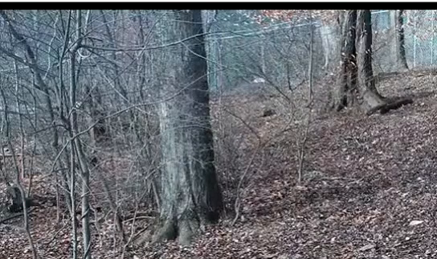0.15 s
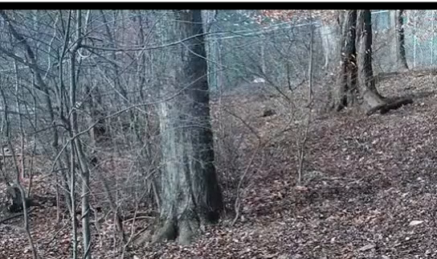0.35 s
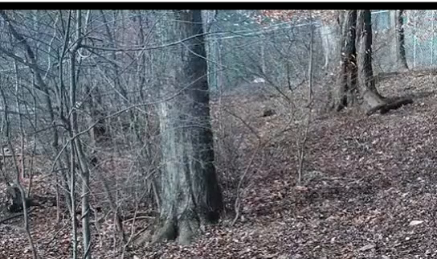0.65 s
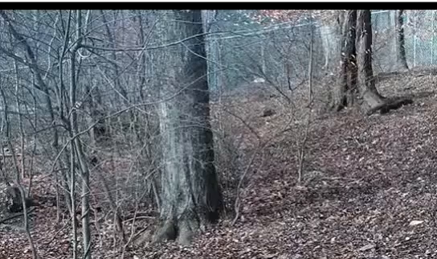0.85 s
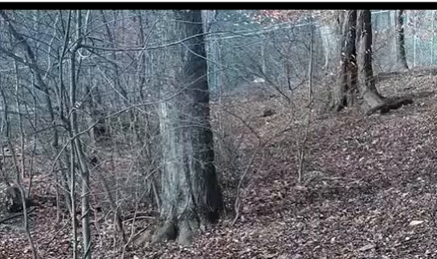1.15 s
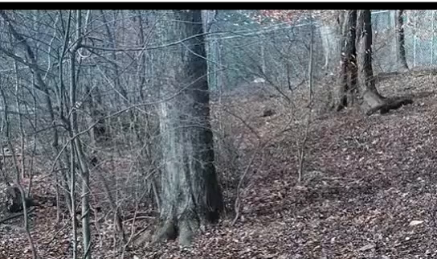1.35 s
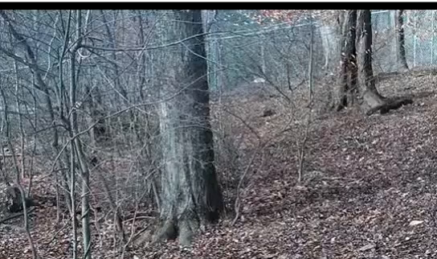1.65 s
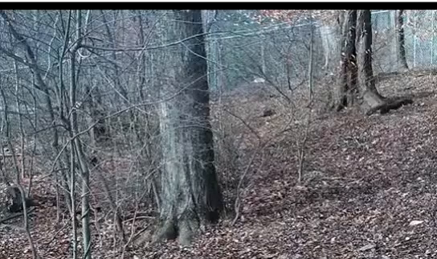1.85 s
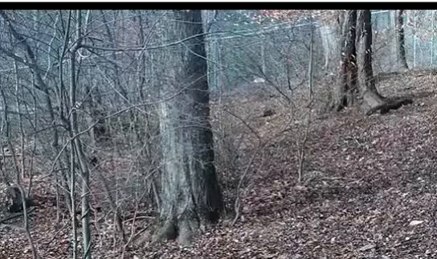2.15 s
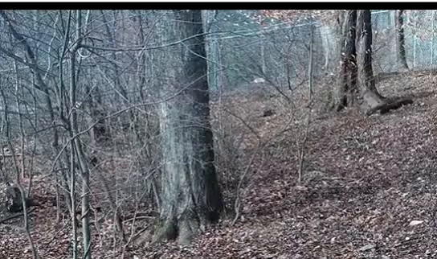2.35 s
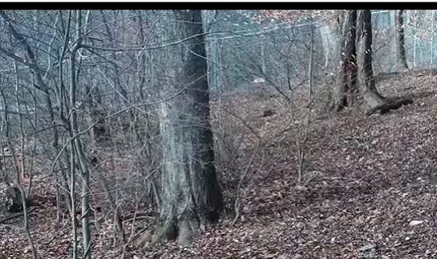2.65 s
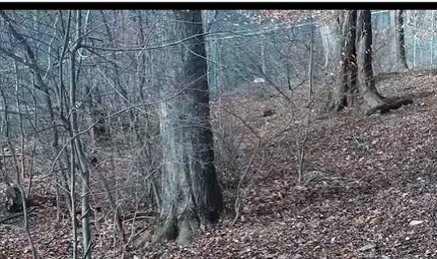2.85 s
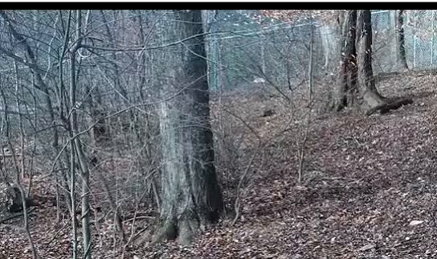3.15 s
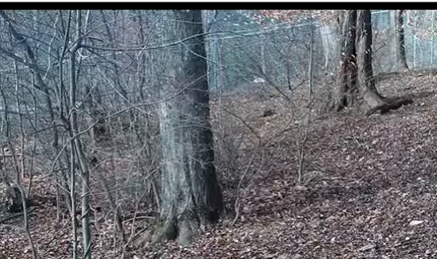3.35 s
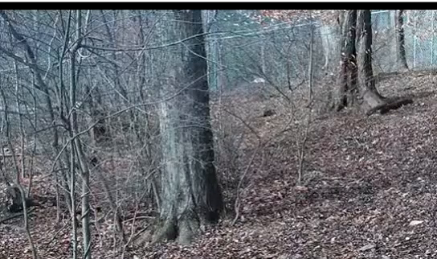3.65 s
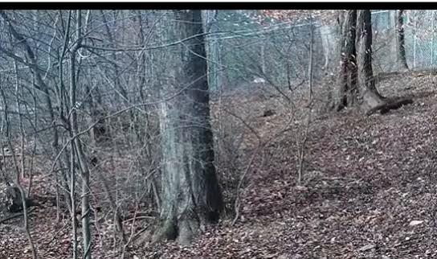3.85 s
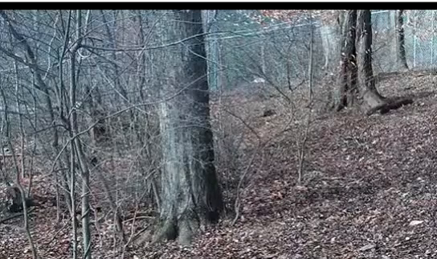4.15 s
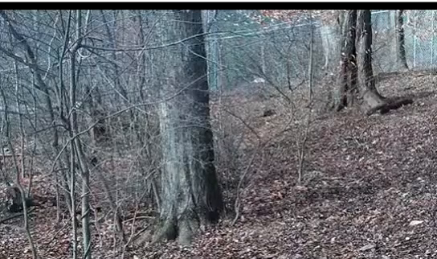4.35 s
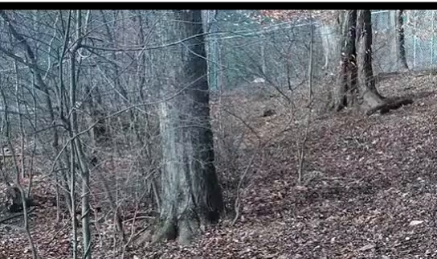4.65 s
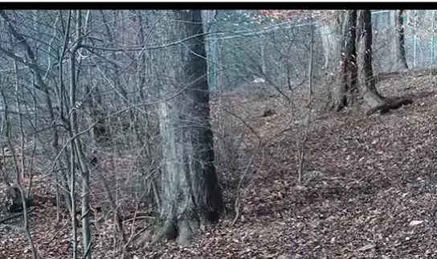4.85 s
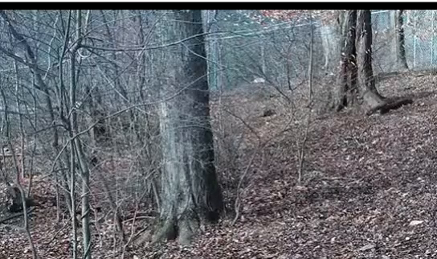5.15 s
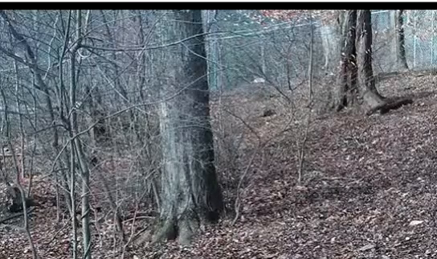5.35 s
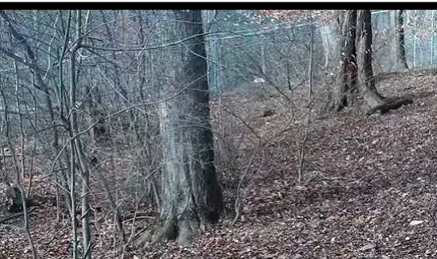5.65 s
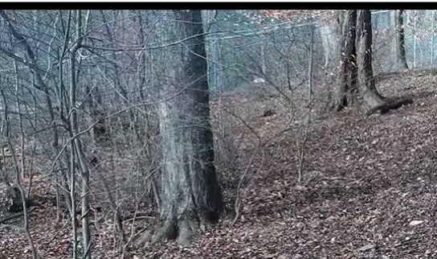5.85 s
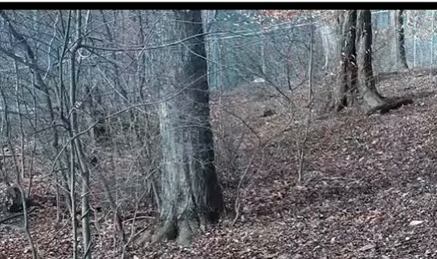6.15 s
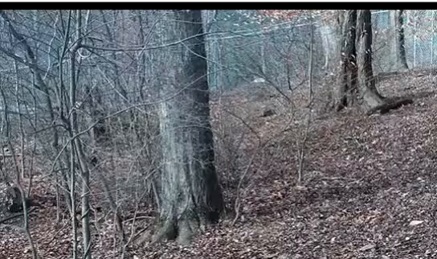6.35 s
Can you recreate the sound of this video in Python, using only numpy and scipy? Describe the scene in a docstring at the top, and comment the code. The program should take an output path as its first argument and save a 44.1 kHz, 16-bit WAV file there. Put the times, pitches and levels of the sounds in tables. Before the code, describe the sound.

From the start, wind buffets a small camera's microphone in a bare wood, making a low, fluttering rumble that is strongest in the first second. Short, low moans waver inside it, like far howls or air blowing over an opening. A faint hiss of dry leaves and a thin electronic buzz continue throughout, and the overall tone is muffled. Puffs of air and small rustles begin near 0.4 seconds and return now and then. The sound drops out for an instant, with sharp clicks and a soft thump, at about 0.5, 2.1 and 3.9 seconds. A longer howl comes at 1.6 seconds, then the wind eases briefly before building again. More howls follow at 4.0 and 4.7 seconds. From 5.2 seconds the clearest howl holds, trembling, sinking slightly in pitch and rising again, with light leaf rustles, until the end at about 6.5 seconds.

```python
"""From the start, wind buffets a small camera's microphone in a bare wood, and short low moans (far howls,
or air over the port) waver in it. Dry leaves hiss and the camera's electronics buzz at 60 Hz. Puffs and
rustles begin near 0.4 s. The recorder stalls with clicks and thumps near 0.5, 2.1 and 3.9 s. Longer howls
come at 1.6, 4.0 and 4.7 s, and the last one holds from 5.2 s to the end."""
import sys
import numpy as np
from scipy import signal
from scipy.fft import rfft, irfft, next_fast_len
from scipy.io import wavfile
from scipy.ndimage import uniform_filter1d

SR = 44100
rng = np.random.default_rng(int(sys.argv[2]) if len(sys.argv) > 2 else 0)


def put_to_file(sound):
    """Save the sound as 16-bit audio at rate SR, in the file named by the first command-line argument."""
    columns = np.atleast_2d(sound).T  # one column per channel
    safe = np.clip(columns, -1, 1)
    whole_steps = np.round(safe * 32767)
    wavfile.write(sys.argv[1], SR, whole_steps.astype(np.int16))


N = 286209
t = np.arange(N) / SR
PAN = np.array([[.5], [-.5]])  # splits a left-minus-right dB value


def undb(db):
    """dB to gain."""
    return 10 ** (np.asarray(db) / 20)


def unit(x):
    """Scale to rms 1."""
    return x / np.sqrt(np.mean(x ** 2))


def walk(rate_hz):
    """Random steps, smoothed twice, rms 1."""
    hold = int(SR / rate_hz)
    steps = np.repeat(rng.standard_normal(N // hold + 1), hold)
    return unit(uniform_filter1d(uniform_filter1d(steps, hold), hold)[:N])


def on_log(hz, table):
    """Interpolate (freq_hz, value) rows on a log axis."""
    freq_hz, values = np.transpose(table)
    return np.interp(np.log(hz), np.log(freq_hz), values)


def band(hz, log_width, coherence):
    """Stereo noise band, Gaussian in log frequency, rms 1."""
    size = next_fast_len(N, True)
    bell = np.exp(-.5 * (np.log(np.fft.rfftfreq(size, 1 / SR) / hz + 1e-9) / log_width) ** 2)

    def noise():
        phase = np.exp(2j * np.pi * rng.random(len(bell)))
        return unit(irfft(bell * phase * rng.rayleigh(size=len(bell)), size)[:N])

    mid = np.sqrt((1 + coherence) / 2) * noise()
    side = np.sqrt((1 - coherence) / 2) * noise()
    return np.array([mid + side, mid - side])


def bursts(rows, log_width, coherence):
    """Gaussian swells of band noise, each normalised to its level."""
    out = 0
    for centre_s, db, hz, sigma_ms in rows:
        swell = np.exp(-.5 * ((t - centre_s) * 1000 / sigma_ms) ** 2)
        burst = swell * band(hz, log_width, coherence)
        out += undb(db) * burst * np.sqrt(np.sum(swell ** 2) / np.sum(burst.mean(axis=0) ** 2))
    return out


def wavering_tone(time_s, hz, db, waver, flutter_db, flutter_hz, fade_s=.02):
    """Sine along a pitch and level curve, shivering in both."""
    gate = np.clip(np.minimum(t - time_s[0] + fade_s, time_s[-1] + fade_s - t) / fade_s, 0, 1)
    pitch_hz = np.interp(t, time_s, hz) * (1 + waver * walk(30))
    gain = undb(np.interp(t, time_s, db) + flutter_db * walk(flutter_hz))
    return gate * gain * np.sqrt(2) * np.sin(2 * np.pi * np.cumsum(pitch_hz) / SR)


# gust strength: time_s, deep_db, body_db, flutter_db
GUSTS = [(0.0, -28.5, -24, -29), (0.499, -26.5, -16, -26), (.8, -28.5, -25, -30.5), (1.14, -28.5, -22, -33),
         (1.55, -31.5, -26, -37.5), (1.8, -31.5, -22.5, -30.5), (2.2, -33.5, -31, -38.5),
         (2.6, -27, -37.5, -39.5), (2.93, -30.5, -28, -34.5), (3.2, -28, -28.5, -30),
         (3.61, -25, -32, -35.5), (3.83, -25, -27.5, -31), (4.03, -30, -28.5, -38.5),
         (4.3, -28.5, -29, -31.5), (4.63, -27.5, -23, -35), (5.08, -28.5, -24.5, -31),
         (5.5, -35.5, -30.5, -31), (5.86, -26.5, -22.5, -32), (6.2, -31, -22.5, -30.5),
         (6.49, -31, -28, -32)]
# gust register centres: deep_hz, body_hz, flutter_hz
REGISTERS_HZ = [70, 180, 340]
# rumble spectrum: freq_hz, gain_db
WIND_SPECTRUM = [(28, -26), (50, -10.5), (90, -1.5), (140, 0), (220, 2.5), (320, -0.5), (450, -9.5),
                 (640, -29.5), (900, -38)]
# brief dips in the low noise, broad in the bass, narrow and hollow just above the moans' pitch:
# centre_s, half_length_ms, depth_db, low_hz, high_hz
LOW_DIPS = [(2.54, 110, -13, 20, 220), (2.58, 90, -13, 325, 365), (2.83, 27, -11, 20, 130),
            (3.51, 59, -12.5, 20, 141), (3.82, 60, -9.5, 280, 428), (4.17, 87, -11, 290, 315),
            (4.26, 59, -19, 325, 410), (4.41, 23, -7, 21, 300), (4.809, 75, -10, 223, 320),
            (5.43, 120, -38, 230, 314), (5.47, 66, -6.5, 21, 90), (5.69, 42, -20, 190, 320),
            (5.771, 40, -16, 20, 150), (6.02, 39, -9, 20, 150), (6.14, 90, -19, 236, 326),
            (6.19, 29, -12, 20.2, 120), (6.38, 50, -20.5, 230, 318)]


def wind():
    """Eddies on the microphone ports: narrow bands follow the gusts, each with its own flicker."""
    time_s, *register_db = np.transpose(GUSTS)
    out, shake_db = 0, 2.09 * walk(22.013)
    for hz in 28 * 2 ** np.arange(0, 5.1, 1 / 5):
        weights = [np.interp(np.log(hz), np.log(REGISTERS_HZ), row) for row in np.eye(3)]
        db = np.interp(t, time_s, np.dot(weights, register_db)) + on_log(hz, WIND_SPECTRUM)
        db += shake_db + 2.26 * walk(9)
        for centre_s, half_ms, depth_db, low_hz, high_hz in LOW_DIPS:
            window = np.exp(-np.square(((t - centre_s) * 1000 / half_ms) ** 2))
            db += depth_db * window / (1 + (low_hz / hz) ** 20) / (1 + (hz / high_hz) ** 20)
        coherence = on_log(hz, [(30, .32), (70, .73), (150, 1), (300, .97), (700, .99)])
        out += undb(db - 4.5) * band(hz, .079, coherence)
    return out


# short moans: start_s, length_s, first_hz, last_hz, level_db
MOANS = [(0.0, 0.053, 210, 217, -12), (.02, 0.11, 152, 145, -16.5), (.06, 0.14, 307.2, 285, -13.5),
         (.21, 0.13, 218, 205.4, -14.5), (.41, 0.044, 192.8, 193, -17.5), (.62, 0.108, 144.7, 161, -12),
         (.68, 0.15, 217, 184.2, -14), (.85, 0.36, 137.9, 131, -22.5), (1.265, 0.072, 250, 188, -13),
         (2.45, 0.21, 134.7, 134.3, -33.5), (2.68, 0.085, 100.3, 91, -27), (2.75, 0.073, 214.6, 202, -28),
         (2.78, 0.094, 160, 160, -23.5), (2.88, 0.19, 125, 122.5, -21), (3.1, 0.12, 222, 210, -21),
         (3.24, 0.1, 282, 240, -23), (3.35, 0.08, 270.3, 243, -23), (3.62, 0.063, 150.3, 230, -18),
         (3.24, 0.14, 148.4, 121, -22), (3.45, 0.18, 165, 180, -23.5), (3.72, 0.18, 207.1, 206.3, -23),
         (3.74, 0.079, 140.5, 134, -25.5), (3.96, 0.09, 149.5, 144.5, -16.5), (4.28, 0.12, 130, 124, -26),
         (4.58, 0.19, 175, 152, -24.5), (4.76, 0.19, 138.9, 157.4, -21.5),
         (5.08, 0.19, 150.8, 157.2, -18.5), (3.98, 0.17, 79.7, 91, -26), (5.52, 0.16, 80, 72, -29.5),
         (5.83, 0.14, 149.1, 145, -28), (2.3, 0.098, 94, 100, -34), (2.41, 0.094, 214.8, 242, -37)]


def moans(attack_share=.41, release_share=.46, edge_db=-8):
    """Far howls or air over the port: short tones swell, hold and fade as they glide."""
    progress = np.array([0, attack_share, 1 - release_share, 1])
    out = 0
    for start_s, length_s, first_hz, last_hz, level_db in MOANS:
        time_s = start_s + length_s * progress
        hz = first_hz + (last_hz - first_hz) * progress
        db = level_db + np.array([edge_db, 0, 0, edge_db])
        out += wavering_tone(time_s, hz, db, waver=.011, flutter_db=2.2, flutter_hz=38)
    return out


# hiss strength: time_s, level_db
LEAF_LEVELS = [(0.0, -45), (0.38, -45.5), (1.08, -47.5), (1.81, -44.5), (2.44, -46.5), (3.4, -45),
               (4.8, -44.5), (5.4, -45), (5.78, -44.5), (6.49, -45.5)]
# hiss spectrum: freq_hz, density_db
LEAF_SPECTRUM = [(500, 9), (800, -1.5), (1200, -6), (1800, -7.5), (2300, -1), (2850, 2), (3300, -4),
                 (3800, -9), (4600, -9), (6800, -14)]


def leaves():
    """Distant dry leaves: a smooth hiss, its treble to the left."""
    out, swell_db = 0, .4 * walk(6.6)
    for hz in 500 * 2 ** np.arange(0, 3.9, 1 / 6):
        bandwidth_db = 10 * np.log10(hz / 2900)
        db = on_log(hz, LEAF_SPECTRUM) + bandwidth_db + swell_db + 1.2 * walk(18)
        pan_db = on_log(hz, [(700, -2), (1300, -.5), (2400, .5), (4400, 14)])
        coherence = on_log(hz, [(500, .82), (1400, .75), (3000, .58), (6000, .3)])
        out += undb(db - 8) * undb(pan_db * PAN) * band(hz, .055, coherence)
    return out * undb(np.interp(t, *np.transpose(LEAF_LEVELS)))


# ticks of one cycle: offset_ms, ring_hz, relative_db, sigma_ms, sign
BUZZ_TICKS = [(.12, 3920, -28.5, .1, -1), (1.05, 6450, -47.5, .3, 1), (1.52, 5500, -31, .125, 1),
              (2.22, 6400, -47.5, .4, -1), (2.58, 4340, -39, .175, -1), (5.5, 4450, -42.5, .14, -1),
              (8.47, 3050, -32, .135, 1), (9.05, 6450, -47, .2, -1), (10.25, 5250, -45.5, .15, 1),
              (10.92, 4400, -39, .16, 1), (11.16, 4300, -41, .23, 1), (13.84, 4570, -45, .15, 1)]
# cycle timing, shifted by the stalls: from_s, cycle_start_ms
BUZZ_TIMING = [(0, 5.1), (.49, 15.55), (2.067, 5.85), (3.95, 9.3)]


def buzz(rate_hz=60.002, flicker_db=1, trim_db=2.2):
    """Camera electronics: the same ringing ticks in every cycle."""
    from_s, start_ms = np.transpose(BUZZ_TIMING)
    clock_ms = 1000 * t - start_ms[np.searchsorted(from_s, t, "right") - 1]
    out, cycle_ms = 0, 1000 / rate_hz
    for offset_ms, hz, db, sigma_ms, sign in BUZZ_TICKS:
        tick_ms = (clock_ms - offset_ms + cycle_ms / 2) % cycle_ms - cycle_ms / 2
        tick = np.exp(-.5 * (tick_ms / sigma_ms) ** 2) * np.cos(2 * np.pi * hz * tick_ms / 1000)
        out += sign * undb(db + trim_db + flicker_db * walk(40)) * tick
    return out


# wind puffs: centre_s, level_db, centre_hz, sigma_ms
PUFFS = [(.43, -17, 230, 13), (.55, -16, 220, 28), (.59, -20, 250, 14), (1.07, -15.5, 200, 8.7),
         (1.285, -15.5, 260, 13), (1.37, -24.5, 299, 23), (2.7, -25.5, 181, 18), (3.145, -23, 260, 9),
         (3.205, -24, 276, 11), (3.33, -21.5, 189, 55), (3.61, -25.5, 300, 16), (3.68, -16.5, 254, 9.3),
         (3.64, -21.5, 122.5, 47), (4.645, -17.5, 225, 12), (5.76, -26, 299, 28), (5.95, -30, 318, 34),
         (6.28, -28, 284.2, 14)]


def puffs():
    """Sudden slaps of air on the ports."""
    return bursts(PUFFS, log_width=.24, coherence=.97)


# leaf rustles: centre_s, level_db, centre_hz, sigma_ms
RUSTLES = [(.448, -38.5, 2800, 8.1), (1.4, -49, 3520, 27), (3.72, -50, 1340, 87), (3.73, -44, 2270, 34),
           (4.93, -47, 2500, 40), (5.03, -44.5, 3530, 65), (5.13, -46, 2520, 60), (5.422, -42, 2700, 7),
           (5.73, -43.5, 2616, 18), (5.76, -33, 2550, 5.1), (6.08, -45.5, 2600, 28),
           (6.195, -42.5, 3510, 27)]


def rustles():
    """Nearer leaves stir briefly."""
    return bursts(RUSTLES, log_width=.14, coherence=.7)


# dropouts: start_s, end_s, fade_out_ms, floor_gain
STALLS = [(.47303, .51043, 0, 0), (2.0635, 2.0705, 0, .2), (3.9325, 3.9401, 4, .02),
          (3.94304, 3.97045, .3, .03)]


def stall_gain(recover_s=.0025):
    """The recorder stalls: the level drops out, then ramps back."""
    gain = np.ones(N)
    for start_s, end_s, fade_ms, floor in STALLS:
        fall = 1000 * (start_s - t) / (fade_ms + 1e-6)
        rise = (t - end_s) / recover_s
        gain *= np.clip(np.where(t < start_s, fall, rise), floor, 1)
    return gain


# stall clicks: time_s, peak_db, sign, left_minus_right_db
CLICKS = [(.47303, -22, 1, -5), (.51048, -10, 1, -5), (2.06348, -8, -1, -5), (2.07049, -8, 1, -5),
          (3.90347, -18, -1, 0), (3.91049, -16, 1, 0), (3.92304, -25, -1, 0), (3.92736, -20, 1, 5),
          (3.94015, -22, -1, 6), (3.943, -23, -1, 0), (3.97051, -17, 1, -6)]


def clicks(rise_s=2.8e-5):
    """A spike at each join around the stalls."""
    out = 0
    for time_s, db, sign, pan_db in CLICKS:
        age = np.clip((t - time_s) / rise_s + 1, 0, None)
        out += sign * undb(db + pan_db * PAN) * age * np.exp(1 - age)
    return out


# restart swings: start_s, level_db, sign, decay_ms
THUMPS = [(.5108, -10, -1, 30), (2.0639, -3.5, 1, 3.5), (2.0709, -8, -1, 12), (3.9107, -11, -1, 8),
          (3.9276, -13, -1, 6), (3.9403, -28, 1, 30), (3.9707, -13, -1, 8)]


def thumps(pitch_hz=225, rise_s=.00072, hold_s=.0095):
    """A low damped swing as the recorder restarts, cut off by the next stall."""
    out = 0
    for start_s, db, sign, decay_ms in THUMPS:
        age_s = np.clip(t - start_s, 0, None)
        window = np.clip(age_s / rise_s, 0, 1) * np.clip(2 - age_s / hold_s, 0, 1)
        swing = np.exp(-1000 * age_s / decay_ms) * np.sin(2 * np.pi * pitch_hz * age_s)
        later_stalls = [(at_s, fade_ms) for at_s, _, fade_ms, _ in STALLS if at_s > start_s]
        cut_s, fade_ms = min(later_stalls, default=(N / SR, 1))
        gate = np.clip(1000 * (cut_s - t) / fade_ms, 0, 1)
        out += sign * undb(db) * window * swing * gate
    return out


# one curve per howl: time_s, pitch_hz, level_db
HOWLS = [
    [(1.56, 166.5, -27), (1.64, 185.9, -16), (1.818, 185.6, -19.5), (1.896, 178.5, -17.5),
     (1.936, 164.7, -21), (2.06, 161, -25.5)],
    [(3.97, 228.7, -19), (4.042, 240.8, -19), (4.186, 212.9, -21.5), (4.302, 223.6, -15.5),
     (4.39, 210, -30)],
    [(4.68, 227, -27), (4.76, 225.6, -13.5), (4.862, 227, -13), (4.93, 213, -29)],
    [(5.16, 212.1, -28), (5.195, 227.3, -12), (5.245, 223, -9.5), (5.3, 215.7, -13.5), (5.36, 215.6, -9),
     (5.405, 208.6, -14), (5.445, 205.1, -10.5), (5.485, 206.2, -18), (5.575, 198, -12),
     (5.625, 198, -31.5), (5.682, 196, -15.5), (5.712, 195.5, -15.5), (5.772, 192.2, -12.5),
     (5.84, 193, -19.5), (5.892, 208.2, -21), (5.948, 205.6, -14.5), (6.008, 210, -19.5),
     (6.082, 218.3, -17.5), (6.104, 216, -11.5), (6.17, 218.2, -8.5), (6.206, 217.2, -20),
     (6.255, 220.6, -13), (6.298, 228.2, -22), (6.345, 231.1, -11.5), (6.375, 233, -10.5),
     (6.418, 233.4, -12), (6.47, 236.1, -9.5), (6.49, 237, -9)],
]


def howls():
    """Longer, steadier moans near 200 Hz."""
    return sum(wavering_tone(*np.transpose(curve), waver=.0066, flutter_db=.5, flutter_hz=22)
               for curve in HOWLS)


# treble notches: centre_hz, half_width_hz, depth_db
NOTCHES = [(4270, 55, -14), (4930, 35, -14), (5600, 85, -20)]


def muffle(dry, top_hz=6900, left_lag_samples=3):
    """Muffled tone: three narrow, steady gaps in the treble, steep low-pass, late left channel."""
    hz = np.fft.rfftfreq(2 * N, 1 / SR)
    notch_db = sum(db * np.exp(-((hz - centre) / width) ** 4) for centre, width, db in NOTCHES)
    notched = irfft(rfft(dry, 2 * N) * undb(notch_db))[:, :N]
    x = signal.sosfilt(signal.ellip(12, .2, 70, top_hz, fs=SR, output="sos"), notched)
    x[0] = np.pad(x[0], (left_lag_samples, 0))[:N]
    return x


def scene():
    """Wind, tones, leaves and buzz in stereo."""
    return wind() + puffs() + howls() + moans() + leaves() + rustles() + buzz()


def record(dry, top_hz=15500):
    """Muffled tone, stalling recorder, steep low-pass."""
    x = muffle(dry) * stall_gain() + thumps() + clicks()
    return signal.sosfilt(signal.ellip(8, .2, 70, top_hz, fs=SR, output="sos"), x)


dry = scene()
out = record(dry)
put_to_file(out)
```